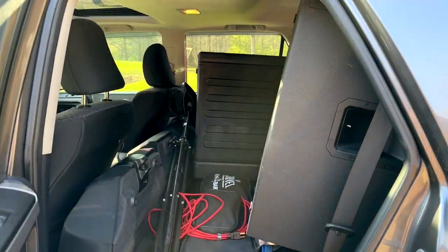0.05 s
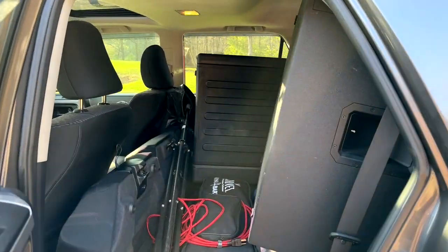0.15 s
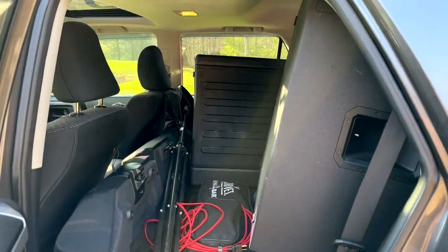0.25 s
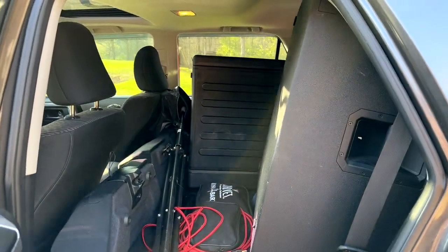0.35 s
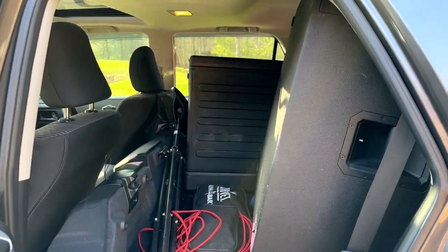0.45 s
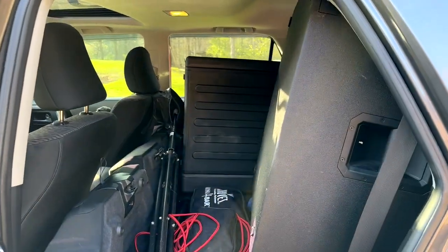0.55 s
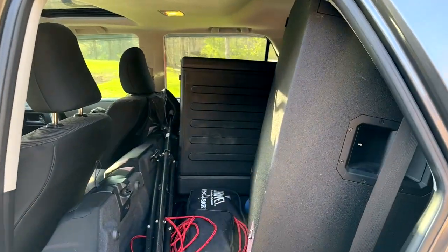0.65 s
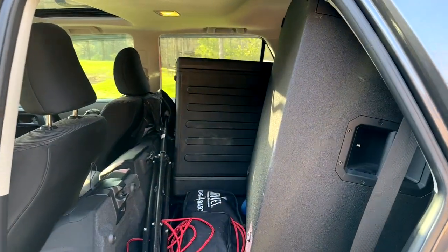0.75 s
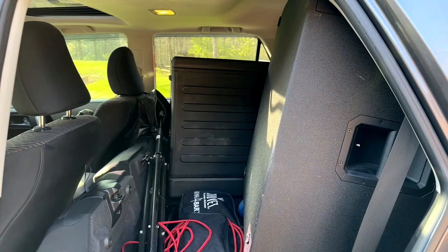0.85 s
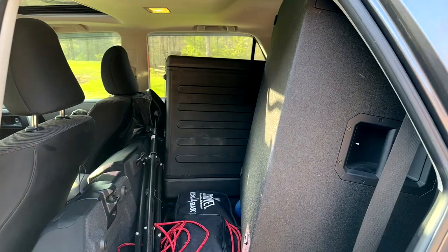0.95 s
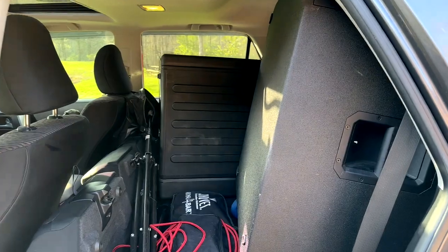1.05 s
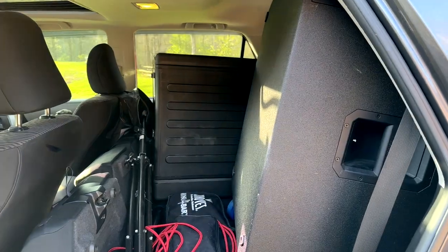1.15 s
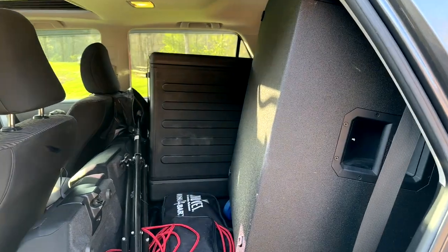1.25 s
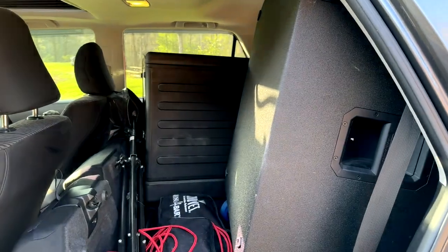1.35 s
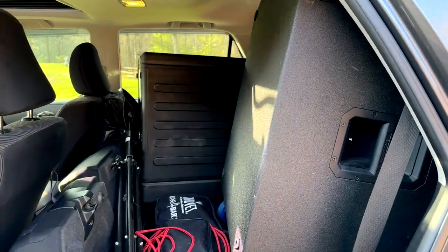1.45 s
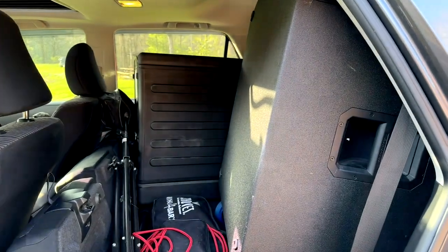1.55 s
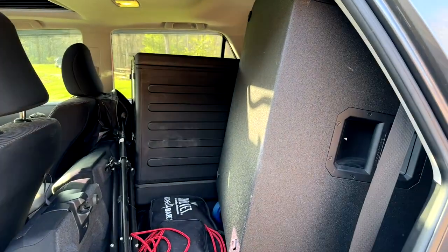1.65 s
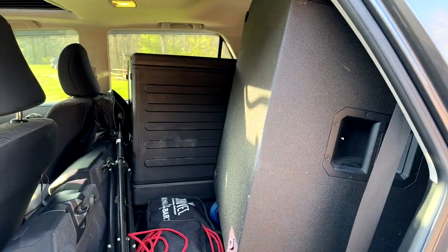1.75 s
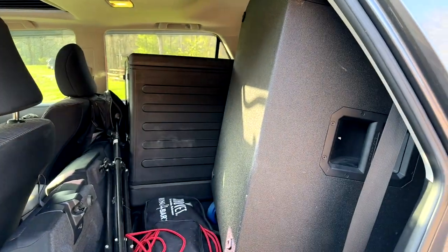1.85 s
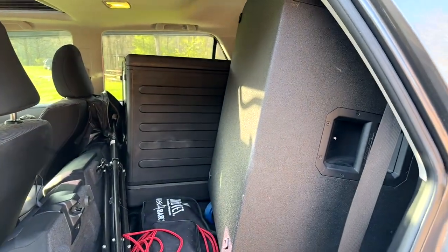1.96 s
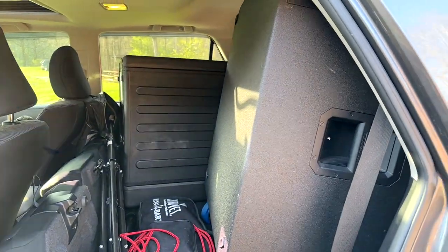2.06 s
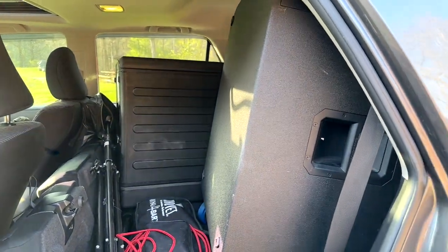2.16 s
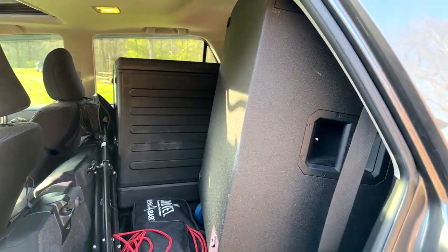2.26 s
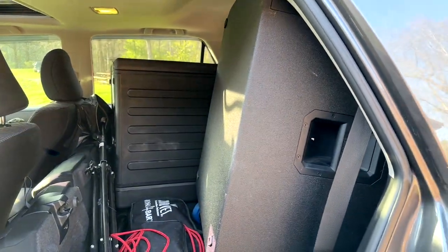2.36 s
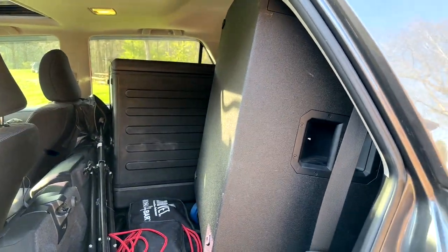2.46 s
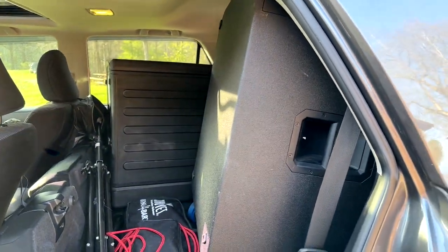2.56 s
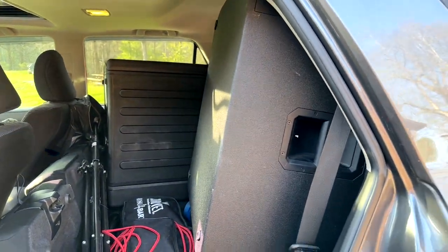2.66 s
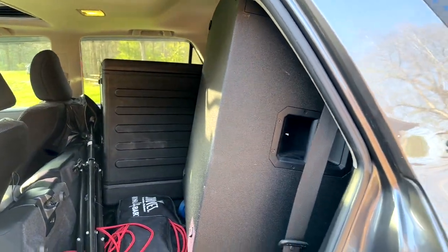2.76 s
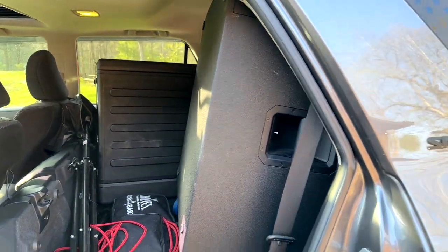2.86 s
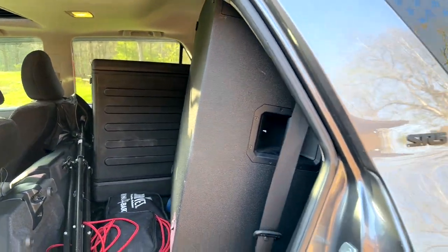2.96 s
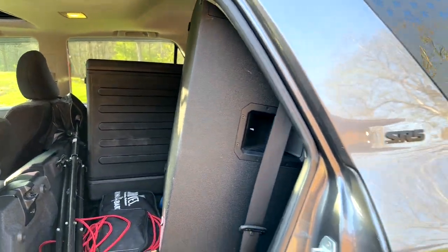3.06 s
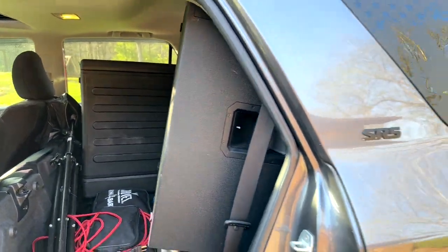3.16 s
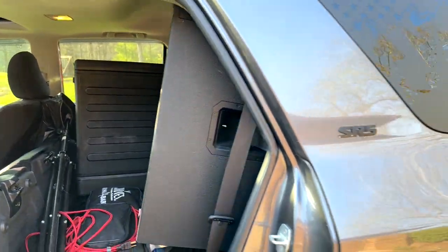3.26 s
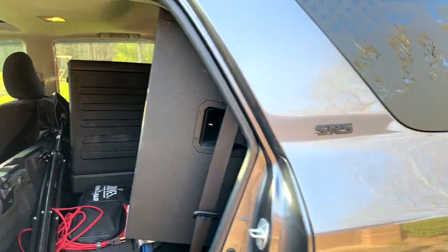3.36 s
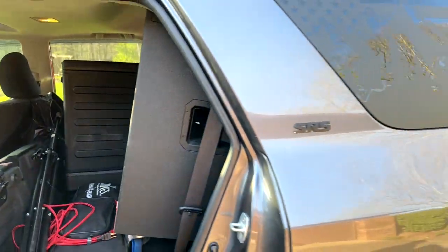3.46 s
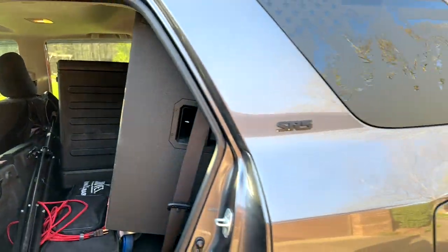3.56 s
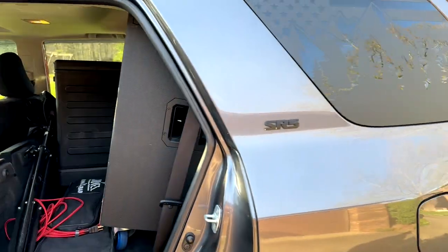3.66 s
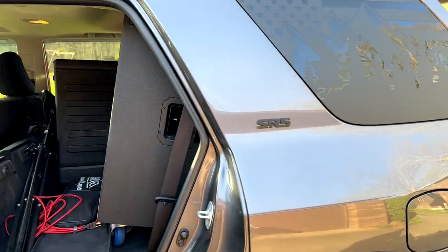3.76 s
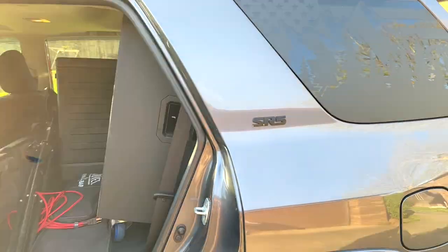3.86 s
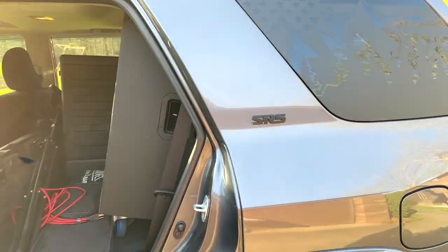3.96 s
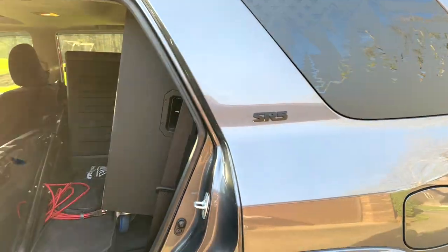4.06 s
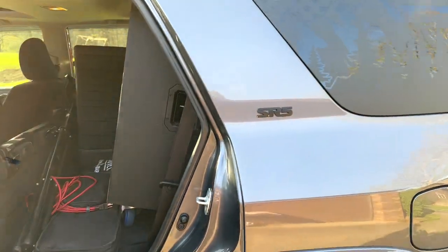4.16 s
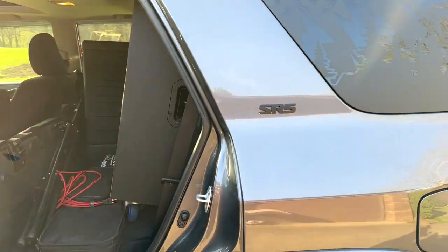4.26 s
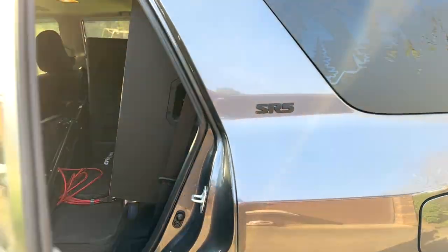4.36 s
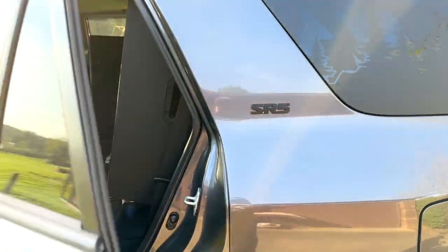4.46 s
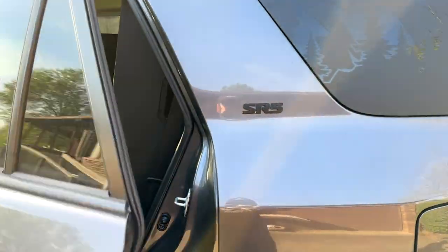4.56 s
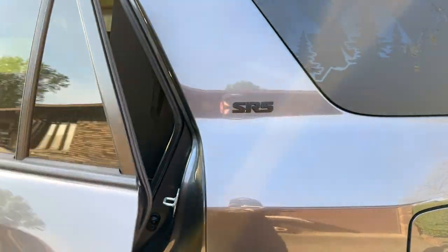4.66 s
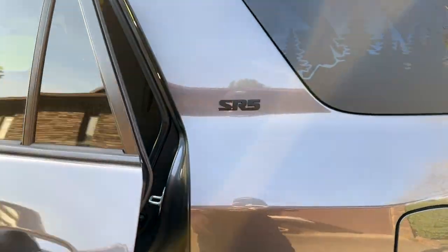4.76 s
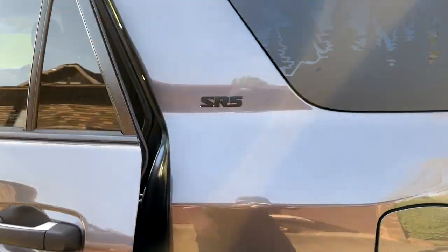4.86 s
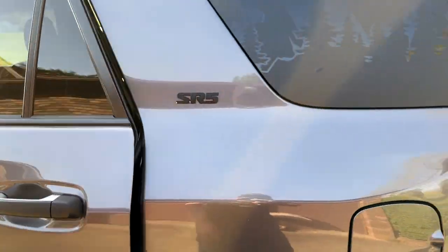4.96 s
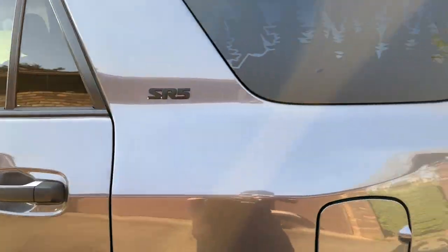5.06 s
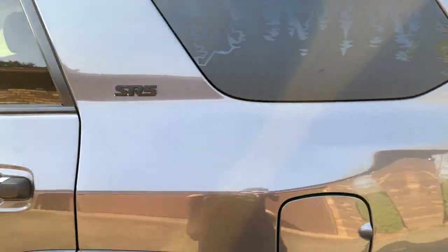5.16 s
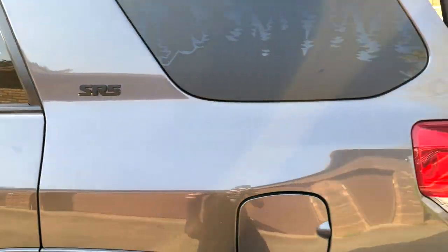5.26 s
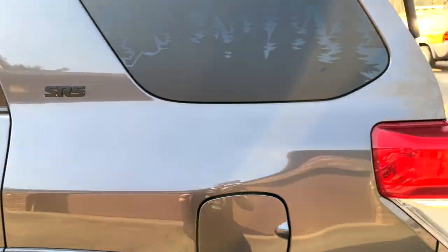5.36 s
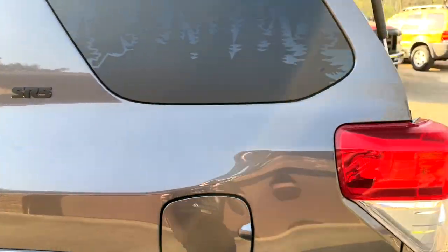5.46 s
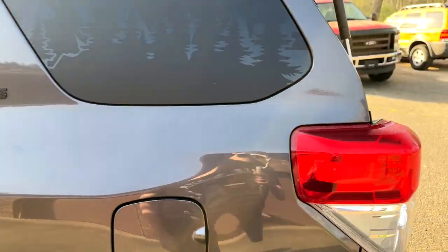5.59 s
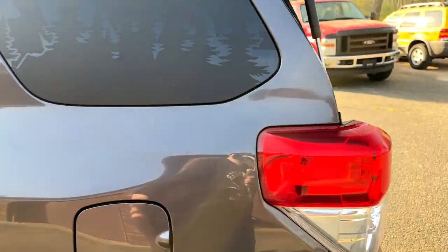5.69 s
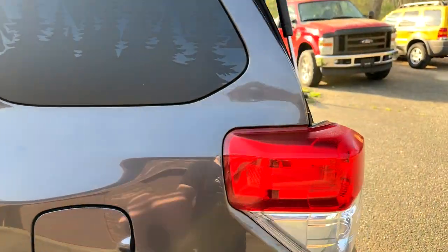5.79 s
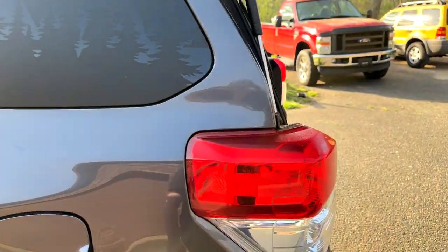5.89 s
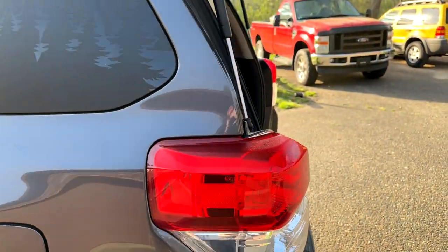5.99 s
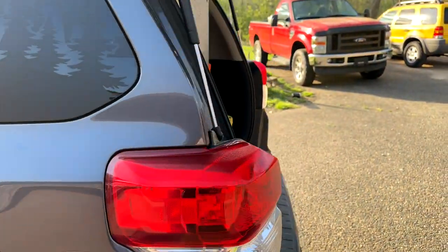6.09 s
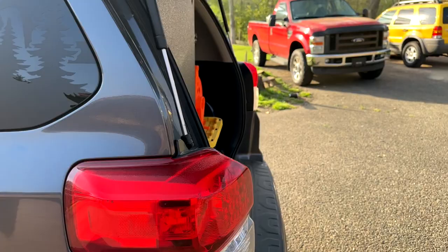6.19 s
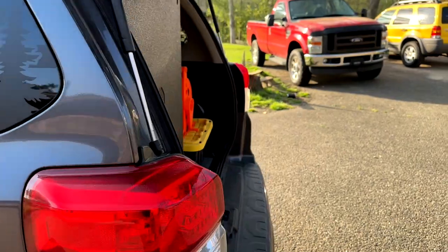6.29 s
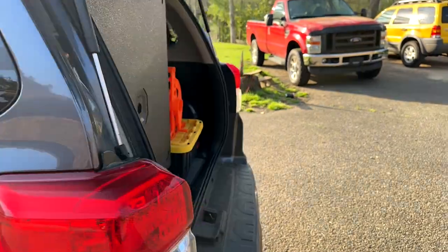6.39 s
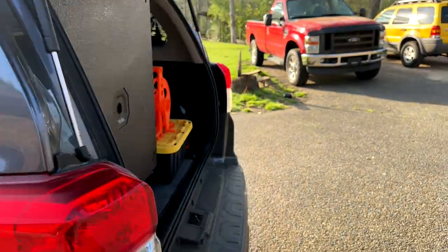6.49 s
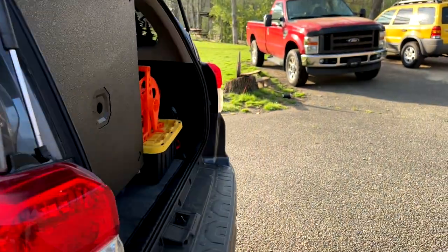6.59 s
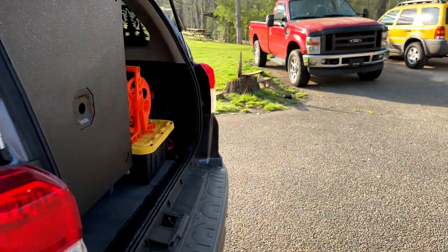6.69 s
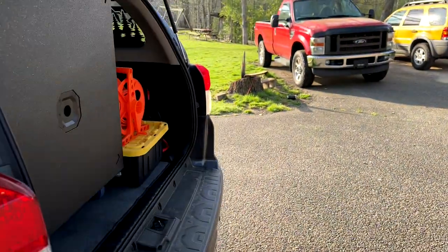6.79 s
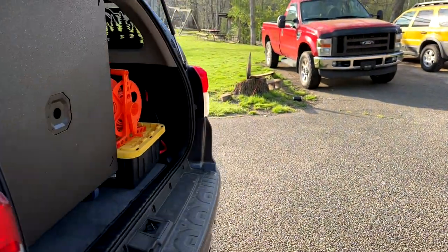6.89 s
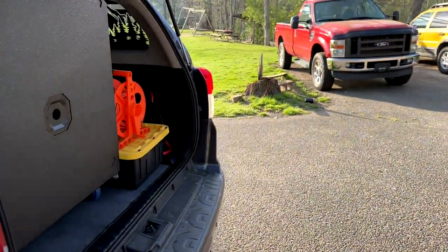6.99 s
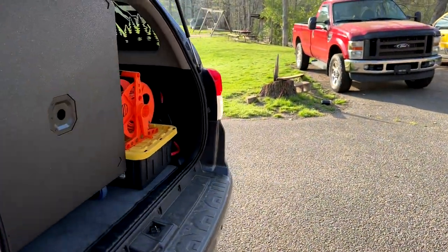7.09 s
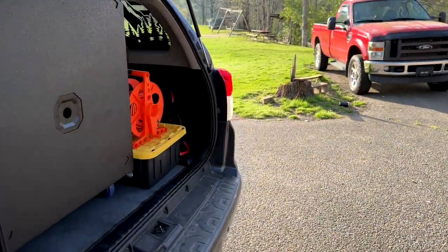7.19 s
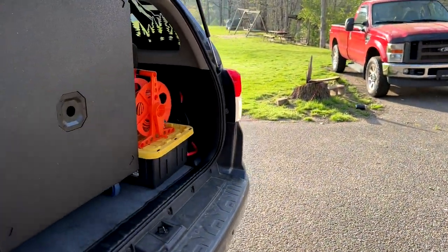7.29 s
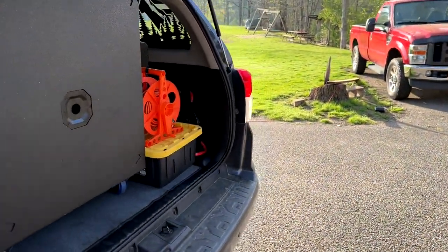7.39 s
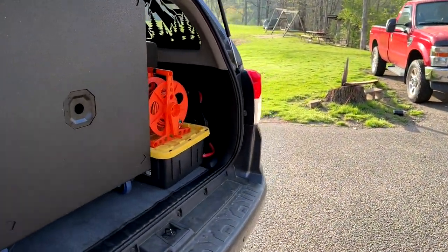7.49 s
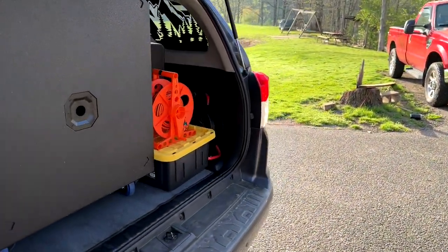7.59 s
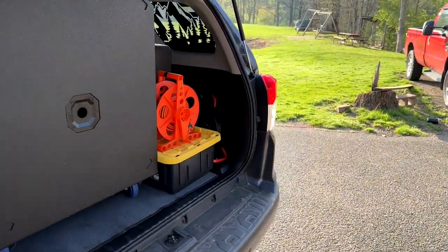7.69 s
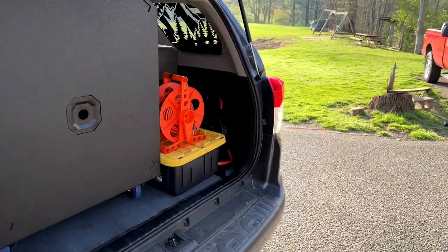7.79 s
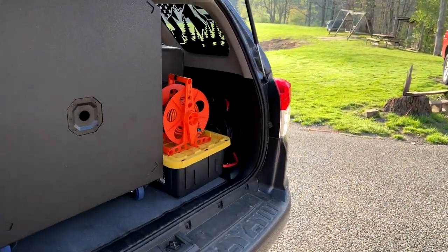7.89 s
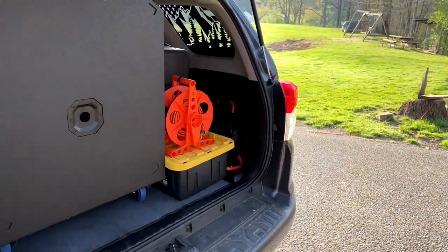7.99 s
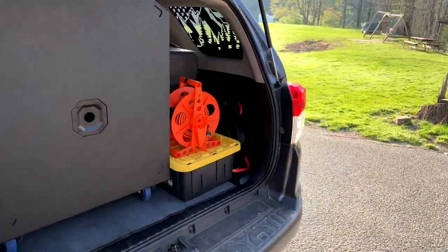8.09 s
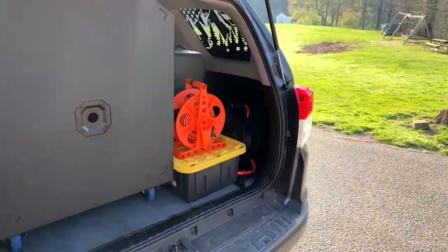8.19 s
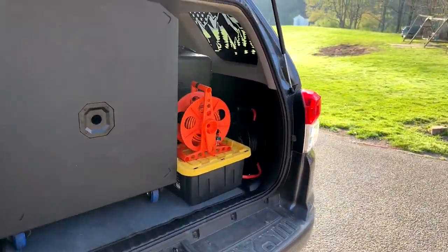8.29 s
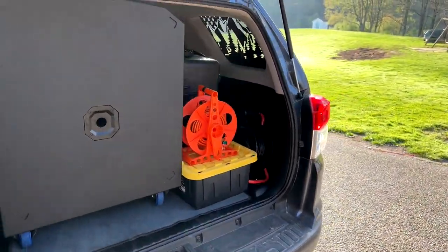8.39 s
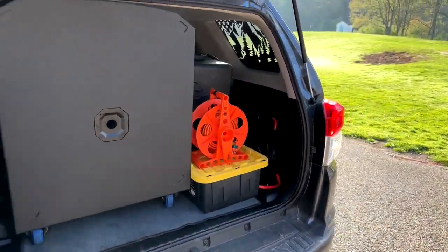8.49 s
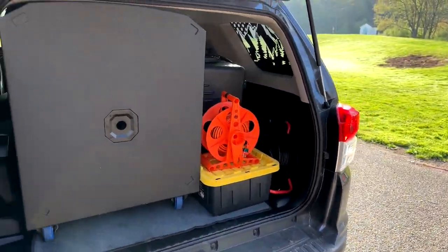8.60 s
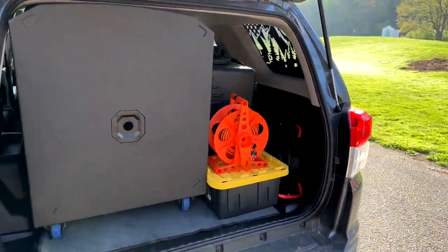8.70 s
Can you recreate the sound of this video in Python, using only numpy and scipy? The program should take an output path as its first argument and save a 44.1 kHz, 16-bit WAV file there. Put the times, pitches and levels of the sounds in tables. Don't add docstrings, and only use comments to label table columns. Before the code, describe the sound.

Outdoors, faint birds and low road rumble, then a close, solid vehicle door slam, a brief trim rattle, and gritty footsteps moving away over pavement.

```python
import sys
import numpy as np
from scipy import signal
from scipy.io import wavfile
from scipy.ndimage import uniform_filter1d

SR = 44100
rng = np.random.default_rng(int(sys.argv[2]) if len(sys.argv) > 2 else 0)


def dump(signal):
    limited = np.clip(np.atleast_2d(signal).T, -1, 1)
    pcm = np.round(limited * 32767).astype(np.int16)
    wavfile.write(sys.argv[1], SR, pcm)


def natural_amplitude(level_db):
    exponent = np.asarray(level_db, float) / 20
    return 10 ** exponent


N = 385434
T = np.arange(N) / SR


def shape(points, hz):
    curve = np.array(points)
    return np.interp(np.log(hz), np.log(curve[:, 0]), curve[:, 1])


def band(x, hz, width_hz):
    sharpness = max(hz / width_hz, .3)
    return signal.lfilter(*signal.iirpeak(min(hz, .45 * SR), sharpness, fs=SR), x)


def noise(hz, width_hz, size=N):
    once = band(rng.standard_normal(size), hz, width_hz)
    twice = band(once, hz, width_hz)
    return twice / twice.std()


def walk(rate):
    points_per_s = 400
    k = int(points_per_s / rate)
    held = np.repeat(rng.standard_normal(int(T[-1] * points_per_s) // k + 2), k)
    smooth = uniform_filter1d(uniform_filter1d(held, k), k)
    return 1.3 * np.interp(T * points_per_s, np.arange(len(held)), smooth)


def add(out, start_s, x, pan_db=0.):
    i = int(start_s * SR)
    x = x[:N - i]
    out[:, i:i + len(x)] += x * natural_amplitude(np.array([[pan_db], [-pan_db]]) / 2)


def lag(x, count):
    return np.array([np.roll(x[0], count), x[1]])


def ring(hz, t60, length=.2):
    t = np.arange(int(length * SR)) / SR
    return np.sin(2 * np.pi * hz * t) * 1000 ** (-t / t60)


def echo(x, wet_db, t60=0.4):
    t = np.arange(int(.6 * SR)) / SR
    tail = rng.standard_normal((2, len(t))) * 1000 ** (-t / t60) * np.clip(t / 0.0073, 0, 1)
    tail /= np.sqrt(np.sum(tail ** 2, axis=1, keepdims=True))
    middle = x.mean(axis=0, keepdims=True)
    return x + natural_amplitude(wet_db) * signal.fftconvolve(middle, tail, axes=1)[:, :N]


def voice(rows, colour, rough, count=12, dull_db=0.):
    s, hz, db = np.transpose(rows)
    t = np.arange(s[0], s[-1], 1 / SR)
    flutter = uniform_filter1d(rng.standard_normal((2, len(t))), 90, axis=1) * np.sqrt(90)
    pitch = np.interp(t, s, hz) * (1 + 0.0433 * rough * flutter[0])
    phase = 2 * np.pi * np.cumsum(pitch) / SR
    stack = np.zeros(len(t))
    for k in range(1, count + 1):
        level_db = shape(colour, k * pitch) + dull_db * (t - s[0]) * max(k - 4, 0)
        stack += natural_amplitude(level_db) * np.sin(k * phase)
    return np.sqrt(2) * stack * natural_amplitude(np.interp(t, s, db)) * (1 + rough * flutter[1])


# start_s, level_db, brightness_db, left_minus_right_db
LATCH_HITS = [(5.0164, -8.5, 2, 5.5), (5.019, -10, 0.5, 2), (5.025, -13.5, -5, -4), (5.032, -18.5, 6, 6),
              (5.0372, -9, 5, 10), (5.0396, -7.5, 5.5, 8.5), (5.046, -16.5, -2, -3),
              (5.065, -30.5, -15.5, 15), (5.073, -21.5, -5.5, 11), (5.105, -24, 1.5, 4.5),
              (5.145, -53, -11, 7)]
# pitch_hz, level_db, t60_s
FRAME_RINGS = [(266, -11.5, 0.17), (343.5, -3.5, 0.11), (436, -1.5, 0.083), (455, -12.5, 0.057),
               (583, 1, 0.058), (790, 4, 0.025), (840, -3, .035), (956, -0.5, 0.047), (1105, -0.5, 0.025),
               (1396, -14.5, 0.053), (2017, -10.5, 0.025), (2700, -18.5, 0.013), (4600, -22.5, 0.021),
               (6300, -22.5, 0.017)]


def latch():
    out = np.zeros((2, N))
    t = np.arange(600) / SR
    crack_shape = np.clip(t / 0.0006, 0, 1) * np.exp(-t / 0.0053)
    for start_s, db, bright_db, pan_db in LATCH_HITS:
        for hz, ring_db, t60 in FRAME_RINGS:
            sign, luck, side = rng.standard_normal(3)
            level_db = db + ring_db - 8.5 + 2 * luck + bright_db * np.log2(hz / 800)
            hit_pan_db = (pan_db + 5 * side) * min(hz / 900, 1)
            add(out, start_s, np.sign(sign) * natural_amplitude(level_db) * ring(hz, t60), hit_pan_db)
        for side_db in (8, 0):
            scrape = rng.standard_normal(len(t))
            crack = band(band(scrape, 3900, 5000), 4500, 12000) * crack_shape
            add(out, start_s, natural_amplitude(db - 25.5 + 2 * bright_db) * crack, side_db)
    return out


# pitch_hz, start_s,
# peak_db, t60_s
SKIN_AND_AIR_RINGS = [(167, 5.0487, -2, 0.115), (123.2, 5.0457, -10, 0.23), (256, 5.047, -23, 0.22),
                      (44.9, 5.15, -27, 0.96), (35.9, 5.05, -22, 0.68), (84, 5.15, -28, 0.28),
                      (174, 5.102, -23, .13), (295, 5.05, -24.5, .25), (345, 5.1, -30.5, 0.22),
                      (127, 5.225, -34, 0.18)]


def skin_and_air():
    out = np.zeros((2, N))
    for hz, start_s, db, t60 in SKIN_AND_AIR_RINGS:
        flex = ring(hz, t60, 1.)
        swell = np.clip(np.arange(len(flex)) * hz / SR * 1.7, 0, 1)
        add(out, start_s, natural_amplitude(db) * flex * swell, 1.)
    return out


BOOM_S, BOOM_RISE_S, BOOM_HOLD_S, BOOM_STOP_S = 5.045, .011, .087, .008
BOOM_DB, BOOM_START_HZ, BOOM_GLIDE_HZ_PER_S, BOOM_SAG_DB_PER_S = -9.5, 54, 150, -35
CABIN_HZ, REBOUND_S, REBOUND_DB, THROB_S, REBOUND_T60_S = 59.45, 5.17, -24.5, .056, 1


def boom():
    on = np.clip((T - BOOM_S) / BOOM_RISE_S, 0, 1) ** 2
    end_s = BOOM_S + BOOM_RISE_S + BOOM_HOLD_S + BOOM_STOP_S
    off = np.clip((end_s - T) / BOOM_STOP_S, 0, 1) ** 2
    since = T - 5.056
    bounce = np.cos(2 * np.pi * (BOOM_START_HZ * since + BOOM_GLIDE_HZ_PER_S * since ** 2 / 2))
    sag = natural_amplitude(BOOM_SAG_DB_PER_S * np.clip(T - 5.09, 0, 1))
    late = np.maximum(T - REBOUND_S, -THROB_S / 2)
    throb = np.abs(np.cos(np.pi * late / THROB_S)) * 1000 ** (-late / REBOUND_T60_S)
    rebound = natural_amplitude(REBOUND_DB) * throb * np.cos(2 * np.pi * CABIN_HZ * (T - 5.0565))
    return natural_amplitude(BOOM_DB) * on * off * sag * bounce + rebound


# pitch_hz, level_db, t60_s
TRIM_BUZZES = [(254, -26.5, 0.44), (700, -23.5, 0.28), (2040, -24.5, 0.13), (4970, -30, 0.17),
               (10000, -45, 0.2)]


def rattle():
    out = np.zeros((2, N))
    t = np.arange(SR // 2) / SR
    for hz, db, t60 in TRIM_BUZZES:
        swell = np.clip(t / 0.0041, 0, 1) * 1000 ** (-t / t60)
        for pan_db in np.array([10, -4]) * min(hz / 900, 1):
            add(out, 5.031, natural_amplitude(db) * noise(hz, 1.25 * hz, size=len(t)) * swell, pan_db)
    return out


def door():
    panel = lag(skin_and_air() + boom(), -14)
    slam = echo(latch() + panel + rattle(), -26)
    return lag(slam, -2)


# start_s, level_db
FIRST_NOTES = [
    (3.471, -53),
    (3.531, -47.5),
    (3.595, -40),
    (3.673, -39),
    (3.761, -40),
    (3.841, -40),
]
STEADY_S, NOTE_GAP_S, WOBBLE_S = 3.923, .0751, .002
TRILL_DB, SWELL_DB_PER_S, SHUT_S, SHUT_DB = -39.5, 1.5, 5.09, -48


def trill_notes():
    wobble = rng.standard_normal(26)
    s = STEADY_S + NOTE_GAP_S * np.arange(len(wobble)) + WOBBLE_S * wobble
    open_db = TRILL_DB + SWELL_DB_PER_S * (s - STEADY_S)
    shut_db = SHUT_DB + 4.6 * SWELL_DB_PER_S * (s - SHUT_S)
    return FIRST_NOTES + list(zip(s, np.where(s < SHUT_S, open_db, shut_db)))


# time_s, pitch_hz, level_db
FALLING_NOTE = [(-.022, 1593, -24), (-.015, 1480, -4.5), (-.007, 1250, -5), (0, 1103, -2),
                (.013, 990, -2.5), (.024, 932, -16.5)]
# time_s, pitch_hz, level_db
LEAD_IN = [(-.04, 734, -43), (-.026, 745.2, -6), (-.012, 725, -9), (-.002, 700, 0)]
# pitch_hz, level_db
BEAK_COLOUR = [(760, -26), (1150, -6.5), (1500, 0), (2100, 0.5), (2800, -7.5), (4000, -54), (6200, -15.5),
               (7500, -33)]


def trill():
    out = np.zeros((2, N))
    for start_s, db in trill_notes():
        stretch, luck = rng.standard_normal(2)
        note = np.array(FALLING_NOTE) * [1 + .08 * stretch, 1 + 0.0153 * luck, 1]
        sung = natural_amplitude(db - 1) * voice(note, BEAK_COLOUR, .4, count=7)
        add(out, start_s - .001 + note[0, 0], sung, -1.7)
        lead_db = db - 2 + luck - 3.5 * (start_s > SHUT_S)
        buzzy = natural_amplitude(lead_db) * voice(LEAD_IN, BEAK_COLOUR, .5, count=9)
        add(out, start_s + LEAD_IN[0][0], buzzy, -1.7)
    nearby = echo(out, -4, t60=.08)
    return lag(echo(nearby, -9), 17)


# start_s, peak_db, ring_hz, dryness_db, left_minus_right_db
HANDLING_CLICKS = [(.621, -45, 740, -14, 4), (0.993, -39, 730, -4, 0), (2.386, -52.5, 867, -21, 1.5),
                   (3.413, -39.5, 1670, 1, 0), (3.438, -35.5, 4000, -8.5, 3), (3.524, -35, 587, -20, -2),
                   (3.54, -31, 810, -28, 3), (4.2, -44.5, 725, -22, 0), (4.346, -39, 1190, -12, 2),
                   (4.233, -45, 1000, -14, 0), (3.53, -40, 700, -26, -1), (3.545, -37, 900, -22, 3),
                   (4.53, -31, 1115, -25, -1), (5.235, -38, 880, -22, 7), (5.215, -50, 1000, -28, 3),
                   (5.226, -44, 1150, -28, 5), (5.244, -40, 1250, -22, 9), (5.631, -59, 900, -18, 0)]
# start_s, peak_db, ring_hz, dryness_db
GRIT_SLIPS = [(5.885, -48, 730, -23), (5.904, -41, 790, -26), (5.93, -45, 900, -26), (5.953, -45, 900, -10),
              (5.997, -44, 1090, -26), (6.023, -47, 1310, -28), (6.031, -42, 1440, -30),
              (6.051, -33, 1000, -24), (6.061, -44, 890, -26), (6.077, -50, 800, -26),
              (6.587, -41, 786, -26), (6.612, -45, 1000, -22), (6.65, -41, 1210, -22),
              (6.8, -47, 1680, -14), (6.938, -45, 900, -24), (6.86, -46.5, 880, -9), (8.5, -52, 1520, -1.5),
              (8.676, -50, 1708, -10), (5.909, -33, 980, -18), (5.966, -35, 1130, -16),
              (5.99, -41, 1040, -26), (6.0355, -30, 1282, -35), (6.048, -29, 890, -30),
              (6.089, -38.5, 744, -7), (6.099, -41, 904, -8), (6.189, -40.5, 1030, -13),
              (6.264, -38, 910, -9), (6.307, -43, 665, -21), (6.581, -40.5, 700, -21),
              (6.635, -40, 880, -28), (6.656, -33.5, 980, -18.5), (6.671, -40.5, 1240, -22),
              (6.794, -48, 1596, -8), (6.933, -42.5, 845, -26), (7.417, -32, 890, -28),
              (7.422, -35, 1000, -26), (7.443, -33, 1020, -28), (7.453, -43, 1110, -21),
              (7.46, -37.5, 1125, -22), (8.214, -43, 855, -15), (8.696, -47, 597, -14),
              (8.712, -41, 585, -18)]


def stones():
    edge_per_dry = 0.72
    rows = [(s, db, hz, dry, -18 + edge_per_dry * dry, pan) for s, db, hz, dry, pan in HANDLING_CLICKS]
    for s, db, hz, dry in GRIT_SLIPS:
        pan_db = 6.5 * rng.standard_normal()
        rows.append((s, db, hz, dry, -9.5 + edge_per_dry * dry, pan_db))
    return rows


def steps():
    out = np.zeros((2, N))
    t = np.arange(900) / SR
    slip, flick = [(t / peak_s) ** 2 * np.exp(2 - 2 * t / peak_s) for peak_s in (.0024, .001)]
    for start_s, db, hz, scrape_db, edge_db, pan_db in stones():
        grain = rng.standard_normal(len(t))
        tone = 1.15 * np.sin(2 * np.pi * hz * t)
        rough_tone = 4.5 * band(band(grain, hz, 0.69 * hz), hz, 0.69 * hz)
        thud = 4 * band(grain, 470, 370)
        body = tone + rough_tone + thud
        dry_loss = 1.6 - 0.6 * min(natural_amplitude(scrape_db + 5.5), 1)
        body *= dry_loss / np.abs(slip * body).max()
        scrape = natural_amplitude(scrape_db + 15) * band(band(grain[::-1], 1950, 2100), 1950, 2120)
        edge = natural_amplitude(edge_db + 10) * band(band(grain, 9600, 5000), 9600, 5000)
        add(out, start_s - .0015, natural_amplitude(db) * (slip * (body + edge) + flick * scrape), pan_db)
    return echo(out, -12, t60=.2)


# time_s, level_db
MOVEMENT = [(0, -7.5), (3.24, -7.5), (3.52, 7), (3.62, 3), (4.08, -1), (4.3, 6), (4.75, 4.5), (4.97, -1.5),
            (5.55, -2), (6.09, 5), (6.47, -1), (7.29, -5), (7.41, 5), (8.1, -0.5), (8.64, 0), (8.74, 0.5)]
RUSTLE_DB, RUSTLE_HZ, RUSTLE_SPREAD_DB = -66.5, 890, 4


def rustle():
    happens = rng.random((2, N)) < .004
    size_db = RUSTLE_SPREAD_DB * np.minimum(rng.exponential(size=(2, N)), 3.5)
    ticks = happens * natural_amplitude(size_db) * rng.choice([-1, 1], size=(2, N))
    shared = ticks + 0.3 * ticks[::-1]
    grains = band(band(shared, RUSTLE_HZ, 1100), RUSTLE_HZ, 1100)
    grains = grains + natural_amplitude(-16.5) * band(band(ticks, 9600, 5000), 9600, 5000)
    level_db = RUSTLE_DB + 1.8 * np.interp(T, *np.transpose(MOVEMENT)) + 2 * walk(9)
    return echo(grains / grains.std() * natural_amplitude(level_db), 1.5, t60=0.13)


# start_s, length_s, start_hz, end_hz, level_db
HEDGE_CHIRPS = [(5.767, .03, 3950, 3670, -67), (5.826, .025, 3170, 3350, -73),
                (6.135, .045, 4320, 4270, -63), (6.29, .05, 3330, 3300, -74), (6.345, .03, 4350, 4070, -67),
                (6.565, 0.022, 4250, 4150, -66), (6.7, .025, 4250, 4560, -63),
                (6.705, .015, 2920, 2950, -63), (6.747, 0.062, 4000, 3980, -70),
                (6.835, .02, 4400, 4470, -69), (6.844, 0.023, 2720, 2680, -60),
                (6.89, 0.022, 4000, 4150, -67), (6.97, .02, 4550, 4500, -66),
                (6.952, .025, 3080, 3030, -66), (7.1, .02, 4560, 4540, -67),
                (7.145, 0.037, 2840, 3050, -63.5), (7.892, 0.02, 4620, 4340, -55),
                (3.058, .06, 4600, 4350, -67), (4.765, .06, 5330, 5210, -61)]


def hedge_bird():
    out = np.zeros((2, N))
    for start_s, length, hz0, hz1, db in HEDGE_CHIRPS:
        rows = [(0, hz0, db - 8), (.2 * length, .8 * hz0 + .2 * hz1, db),
                (.8 * length, .2 * hz0 + .8 * hz1, db), (length, hz1, db - 8)]
        add(out, start_s, voice(rows, [(1000, 0)], .15, count=1), 1.5)
    start_s, length, hz0, hz1, db = 7.885, 1.1, 2851, 2809.5, -60
    rows = [(0, hz0, db - 3), (length / 2, (hz0 + hz1) / 2, db), (length, hz1, db)]
    tone = voice(rows, [(1000, 0)], .15, count=1)
    throb_db = 5 * walk(45)[:len(tone)]
    add(out, start_s, tone * natural_amplitude(throb_db), 1.5)
    return echo(out, -4, t60=0.18)


JAY_RISE_S, JAY_FALL_S, JAY_RISE_DB, JAY_FALL_DB = 0.03, 0.068, -18, -22


def jay_call(start_s, length, hz, sag_hz, db):
    t = np.array([0, JAY_RISE_S, length / 2, length - JAY_FALL_S, length])
    level_db = db + np.array([JAY_RISE_DB, 0, 0, 0, JAY_FALL_DB])
    return np.c_[start_s + t, hz - sag_hz * (t / length) ** 1.4, level_db]


# start_s, length_s, pitch_hz, sag_hz, level_db
JAY_CALLS = [
    (1.634, 0.29, 930.7, 80.4, -54),
    (2.92, 0.2, 945, 54.5, -71.5),
    (3.325, 0.3, 845.5, 73.1, -56.5),
    (4.574, 0.34, 906, 34.7, -56.5),
    (8.02, 0.32, 852, 73.8, -59),
]
# favoured_hz, lift_db, treble_tilt_db_per_octave, roughness_0_to_1, left_minus_right_db
JAY_COLOURS = [(2817, 8, -14, 0.16, 8), (2715, 18.5, 2, .1, 2), (3300, 8, 5.5, 0.69, 6),
               (2680, 13, -5, 0.2, 1), (3220, 10.5, 6.5, 0.56, 5.5)]
JAY_DULLING = [0, 0, -12, -10, -30]
# pitch_hz, level_db
THROAT_COLOUR = [(850, -34.5), (1750, -4.5), (2650, -4), (3350, -4.5), (4400, -13), (5400, -4.5),
                 (7000, -15.5), (11000, -48)]


def jays():
    out = np.zeros((2, N))
    grid = np.geomspace(800, 11000, 60)
    for row, kind, dull_db in zip(JAY_CALLS, JAY_COLOURS, JAY_DULLING):
        peak_hz, lift_db, tilt, rough, pan_db = kind
        octaves = np.log2(grid / peak_hz)
        treble_db = tilt * np.maximum(octaves, 0)
        bass_db = 8 * np.minimum(octaves + 0.49, 0)
        nasal_db = lift_db * np.exp(-(octaves / 0.059) ** 2)
        colour = np.c_[grid, shape(THROAT_COLOUR, grid) + treble_db + bass_db + nasal_db]
        call = voice(jay_call(*row), colour, rough, count=10, dull_db=dull_db)
        add(out, row[0], call, pan_db)
    return echo(out, 0)


# start_s, length_s, start_hz, end_hz, level_db
FAR_WHISTLES = [(.02, 0.2, 3500, 3480, -65), (.454, 0.097, 2900, 2645, -63.5),
                (.48, 0.034, 3970, 3760, -63), (0.539, 0.032, 3390, 3340, -57.5),
                (.789, 0.088, 3610, 3300, -60.5), (0.862, 0.17, 3170, 3150, -61),
                (1.369, .11, 4670, 4440, -65.5), (1.6, 0.25, 2500, 2065, -65.5),
                (2.002, 0.049, 2495, 2700, -62.5), (2.222, 0.15, 3300, 3210, -60.5),
                (6.817, 0.026, 3600, 3420, -60), (6.922, 0.034, 3130, 3740, -63),
                (6.972, 0.018, 3460, 3410, -57), (6.998, 0.13, 2610, 2486, -64.5),
                (7.562, 0.048, 2186, 2225, -61.5), (7.67, 0.18, 2280, 2186, -62.5),
                (7.819, 0.02, 2220, 2340, -53), (8.018, 0.11, 3800, 3750, -63.5)]
# start_s, length_s, start_hz, end_hz, level_db
HOARSE_SOUNDS = [(3.316, 0.049, 2400, 1500, -62), (7.404, 0.017, 4670, 4320, -65),
                 (7.885, .03, 3400, 3100, -61), (7.624, 0.035, 4700, 3500, -65)]


def far_whistles():
    out = np.zeros((2, N))
    calls = [(*row, 0.31 + 0.67 * row[1]) for row in FAR_WHISTLES]
    calls += [(*row, 2.14) for row in HOARSE_SOUNDS]
    for when, long, high, fall, loud in rng.random((120, 5)):
        hz = 2300 + 2000 * high ** 2
        calls.append((8.6 * when, 0.04 + 0.064 * long, hz, hz - 250 * fall, -77 + 6 * loud, .6))
    for start_s, length, hz0, hz1, db, rough in calls:
        rows = [(0, hz0, db - 1.5), (0.194 * length, .8 * hz0 + .2 * hz1, db),
                (max(0.74 * length, length - .04), hz1, db), (length, hz1, db - 9.5)]
        add(out, start_s, voice(rows, [(1000, 0.0015)], rough, count=1), 1.5)
    return echo(out, 0)


# peak_s, rise_s, fall_s, rumble_lift_db, hum_lift_db
AIR_GUSTS = [(.6, 1, 1.2, -2, 7), (1.87, 0.033, 0.2, 12, 10), (2.88, 0.24, 0.32, 3.5, -1),
             (3.69, 0.47, 0.33, -5.5, -3.5), (4.35, 0.48, 0.49, 0, 8.5), (4.47, 0.088, 0.29, 11, 1.5),
             (5.0, 0.29, 0.39, 8.5, 7), (5.62, 0.074, 0.1, 8, -4), (7.41, 0.036, 0.068, -8, 9),
             (6.585, 0.011, 0.062, 2.5, 15.5), (8.76, 0.085, .1, -3, 25)]
LIFT_SHARES = [
    [0.99, 0.15, 0.1, 0.017, 0, 0.28],
    [0.016, 1, 0.05, 0.19, 0.017, 0],
    [0.013, 0.064, 0.78, 0.44, 0.18, 0.54],
]
# pitch_hz,
# level_db_per_hz
ROAD_AND_LEAF_NOISE = [(15, -63), (25, -41), (46, -5.5), (69, 0.5), (119, -11), (215, -15), (509, -22.5),
                       (631, -33.5),
                       (2850, -29), (3260, -29), (5010, -38), (7300, -33), (9300, -72), (12200, -40), (15500, -61.5)]
# pitch_hz, likeness_0_to_1
LEFT_RIGHT_LIKENESS = [(60, 1), (500, 0.57), (2000, 0.53), (6000, 0), (12000, 0.6)]
# pitch_hz, width_hz, level_db
INSECTS = [(7190, 960, -68.5)]
# time_s, pitch_hz, level_db
FAR_ENGINE = [(0, 205.4, -64.5), (.9, 207.7, -54.5), (1.5, 205.3, -66), (2.8, 211.1, -66),
              (3.2, 209.7, -85)]
# time_s, left_minus_right_db
PHONE_TURN = [(0, 2.5), (3.2, 2.5), (3.6, 2.5), (5.5, 1), (6.1, 1.8), (8.74, 1.5)]


def air():
    gusts = np.zeros((2, N))
    for peak_s, rise_s, fall_s, rumble_db, hum_db in AIR_GUSTS:
        puff = np.interp(T, [peak_s - rise_s, peak_s, peak_s + fall_s], [0, 1, 0])
        gusts += np.outer([rumble_db, hum_db], puff)
    moves = np.vstack([gusts, np.interp(T, *np.transpose(MOVEMENT))])
    out = np.zeros((2, N))
    for hz, width_hz, db in INSECTS:
        out += natural_amplitude(db + 2 * walk(30)) * noise(hz, width_hz)
    for hz in 38 * 2 ** (np.arange(27) / 3):
        share_hz = np.log([80, 220, 800, 3000, 7000, 10000])
        share = [np.interp(np.log(hz), share_hz, row) for row in LIFT_SHARES]
        alike = np.clip(shape(LEFT_RIGHT_LIKENESS, hz), 0, 1)
        middle = np.sqrt(1 + alike) * noise(hz, hz / 4)
        side = np.sqrt(1 - alike) * noise(hz, hz / 4) * np.array([[1], [-1]])
        still_db = shape(ROAD_AND_LEAF_NOISE, hz) + 10 * np.log10(hz) - 74.5
        flicker_db = 1.0 * walk(7.3) + 2.3 * walk(2.45)
        out += natural_amplitude(still_db + np.dot(share, moves) + flicker_db) * (middle + side)
    out = signal.sosfilt(signal.butter(3, 42, "highpass", fs=SR, output="sos"), out)
    add(out, 0, voice(FAR_ENGINE, [(1000, 0)], 0.32, count=1))
    return out * natural_amplitude(np.interp(T, *np.transpose(PHONE_TURN)) * np.array([[.5], [-.5]]))


BUZZ_HZ, BUZZ_DB, BUZZ_DUTY = 11870, -68, 0.44
BURSTS_PER_S, BURST_S = 59.95, 2.075


def buzz():
    cycle = ((T - BURST_S) * BURSTS_PER_S + .5) % 1 - .5
    gate = np.cos(np.pi / 2 * np.clip(cycle / BUZZ_DUTY * 1.7, -1, 1)) ** 2
    phase = 2 * np.pi * np.cumsum(BUZZ_HZ + 25 * walk(60)) / SR
    return natural_amplitude(BUZZ_DB + 1.7 * walk(50)) * gate * np.sin(phase)


def scene():
    near = door() + trill() + steps() + rustle()
    birds = hedge_bird() + jays() + far_whistles()
    return near + birds + air()


def band_limit(x):
    return signal.sosfilt(signal.butter(12, 15930, fs=SR, output="sos"), x)


def record(dry):
    dry = np.array([dry[0], np.roll(dry[1], 1)])
    treble = signal.butter(4, 9700, "highpass", fs=SR, output="sos")
    side = signal.sosfiltfilt(treble, (dry[0] - dry[1]) / 2)
    power = uniform_filter1d(side ** 2, size=1024)
    faint = 1 / (1 + (power / natural_amplitude(2 * -63)) ** 2)
    heard = dry - faint * side * np.array([[1], [-1]]) + buzz()
    rounded = np.tanh(0.78 * heard) / 0.82
    top = signal.ellip(8, .2, 70, 15300, fs=SR, output="sos")
    return band_limit(signal.sosfilt(top, rounded))


dry = scene()
out = record(dry)
dump(out)
```